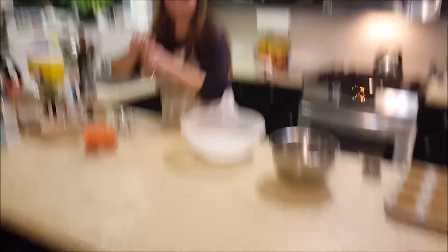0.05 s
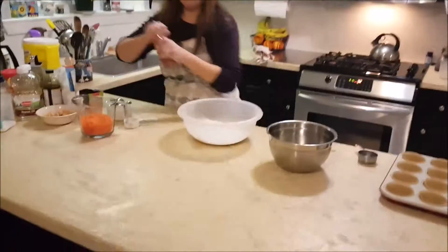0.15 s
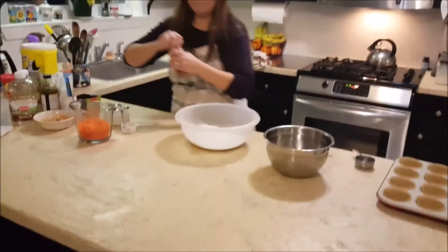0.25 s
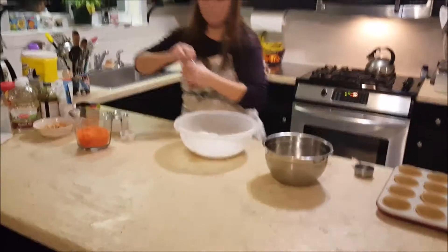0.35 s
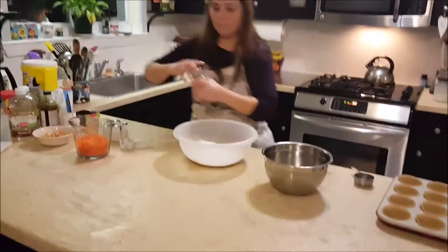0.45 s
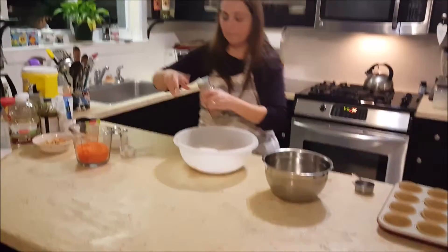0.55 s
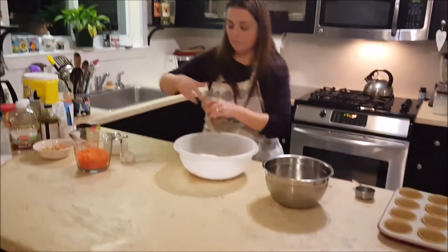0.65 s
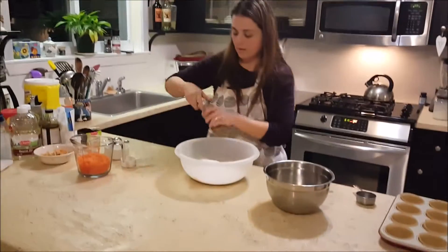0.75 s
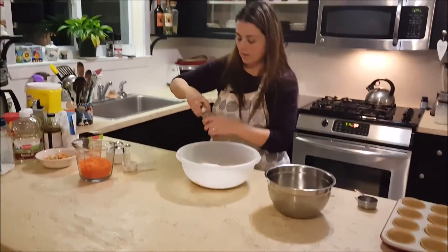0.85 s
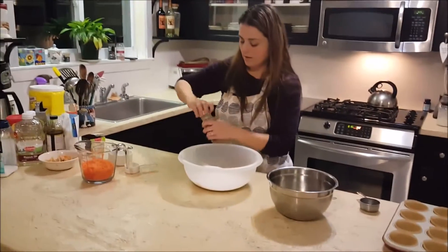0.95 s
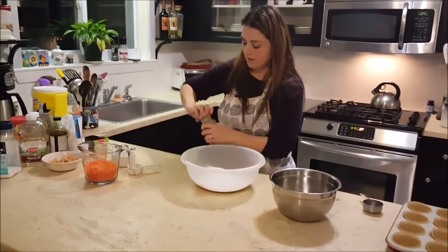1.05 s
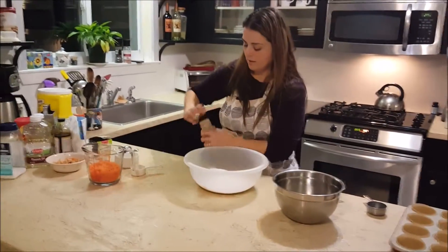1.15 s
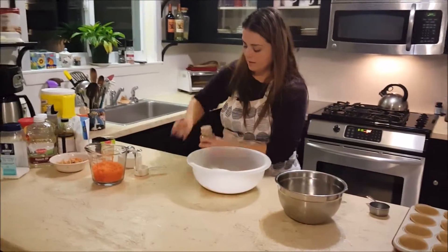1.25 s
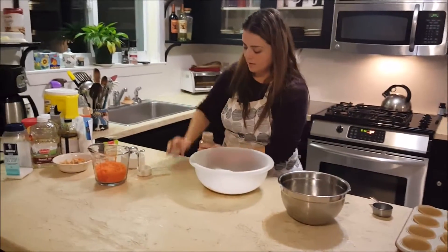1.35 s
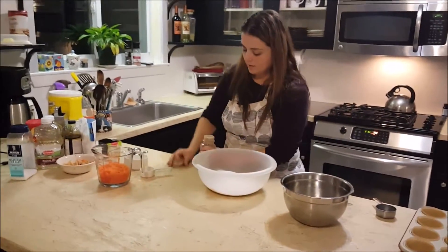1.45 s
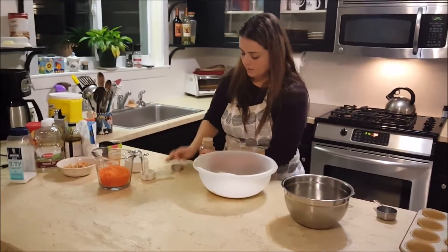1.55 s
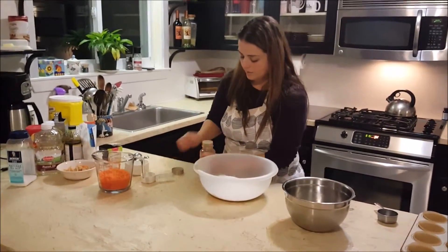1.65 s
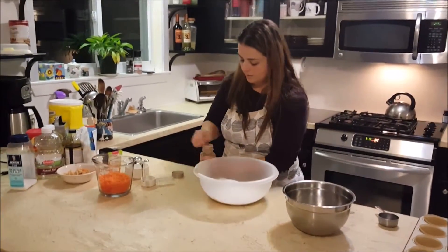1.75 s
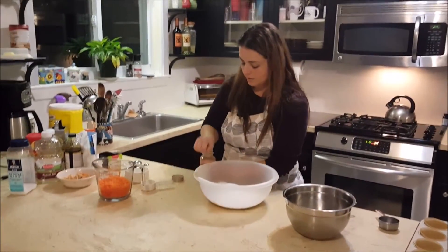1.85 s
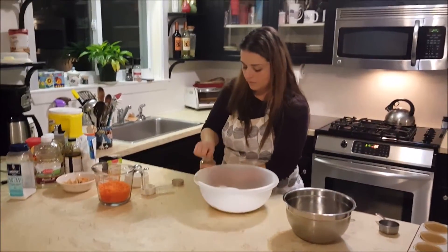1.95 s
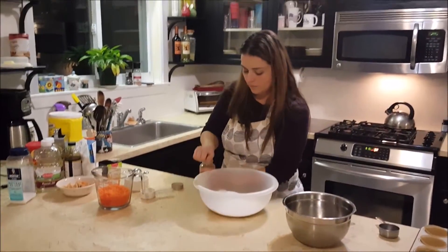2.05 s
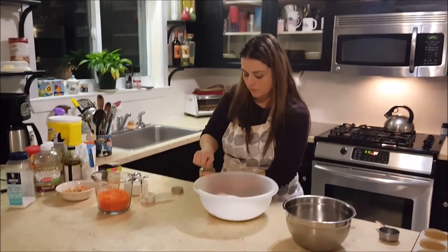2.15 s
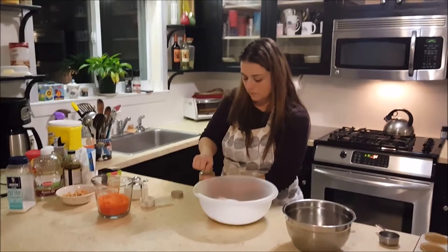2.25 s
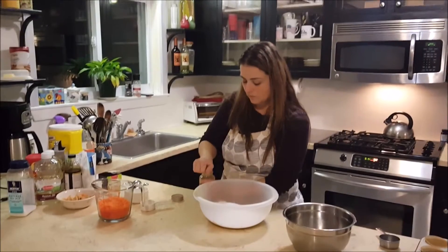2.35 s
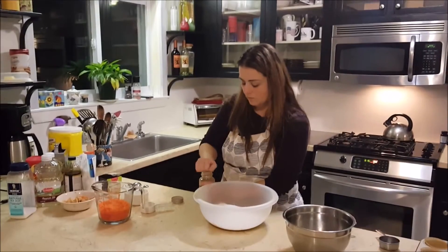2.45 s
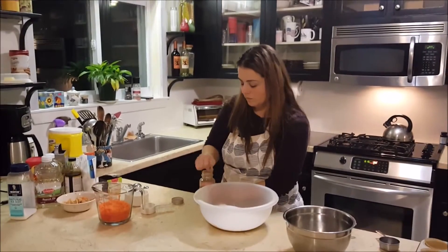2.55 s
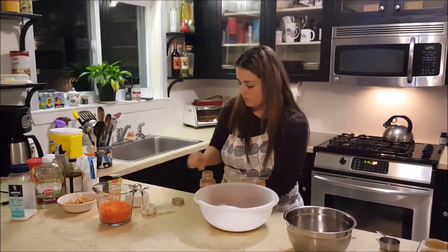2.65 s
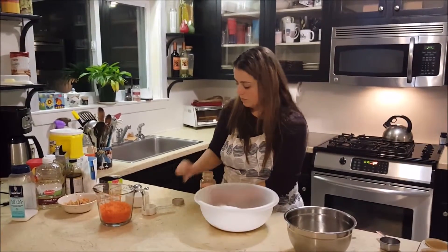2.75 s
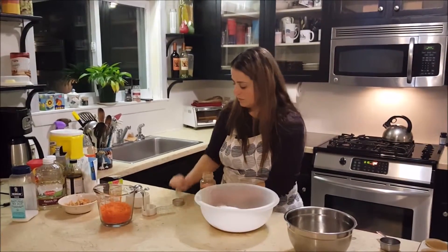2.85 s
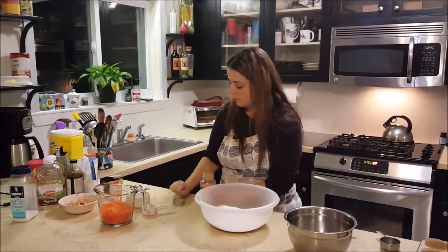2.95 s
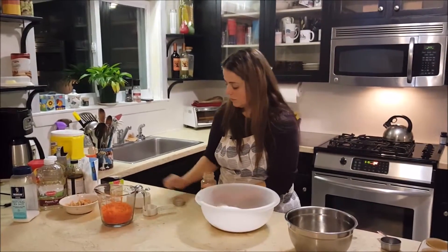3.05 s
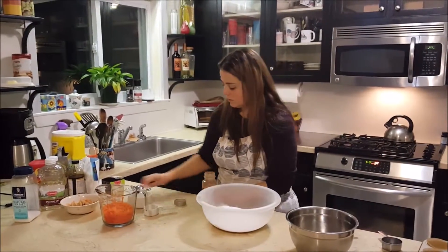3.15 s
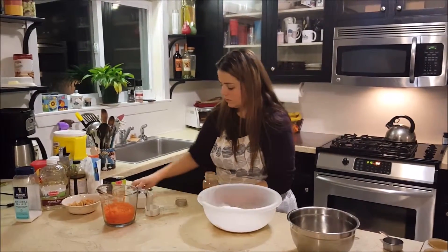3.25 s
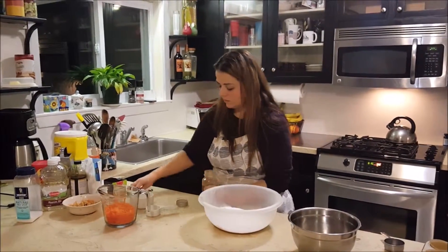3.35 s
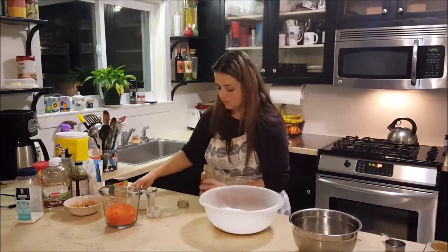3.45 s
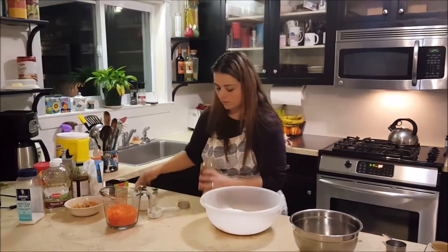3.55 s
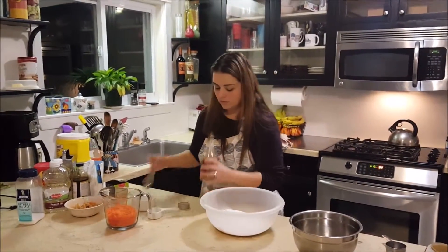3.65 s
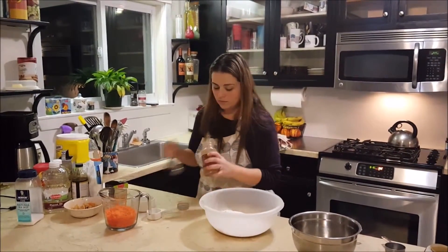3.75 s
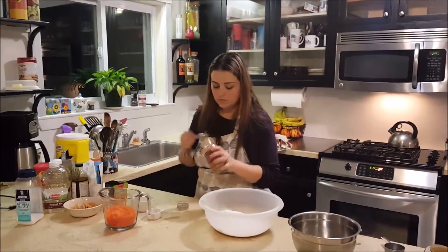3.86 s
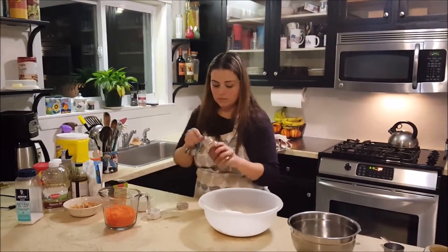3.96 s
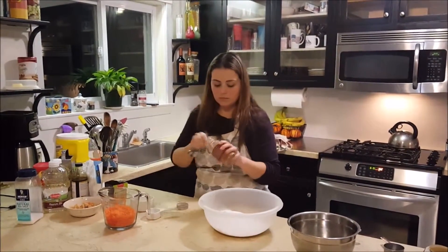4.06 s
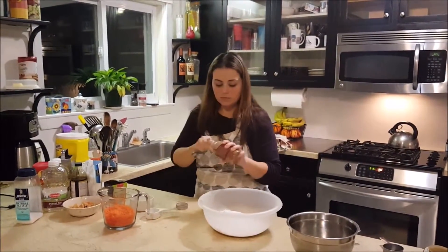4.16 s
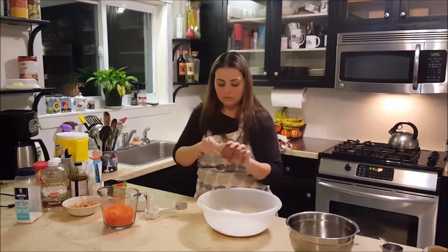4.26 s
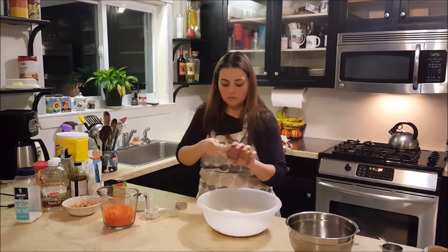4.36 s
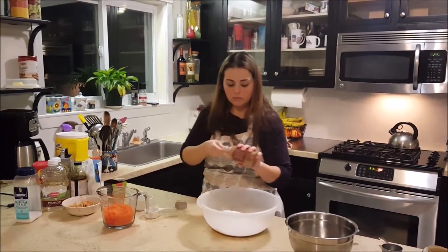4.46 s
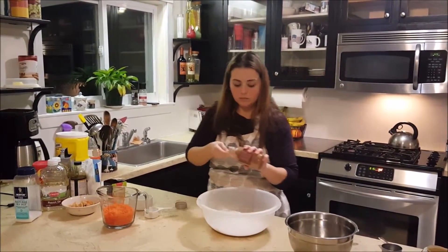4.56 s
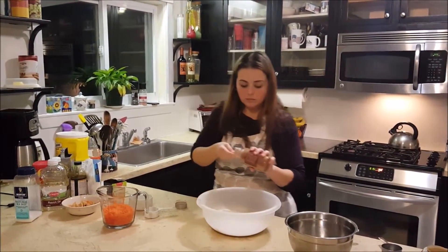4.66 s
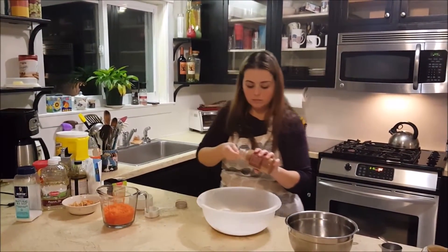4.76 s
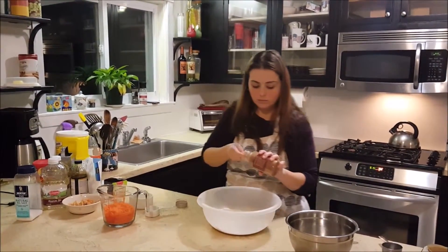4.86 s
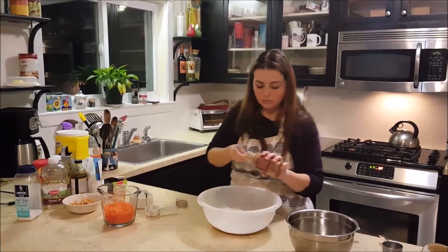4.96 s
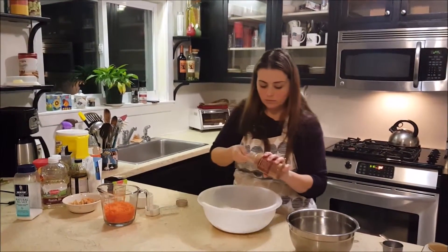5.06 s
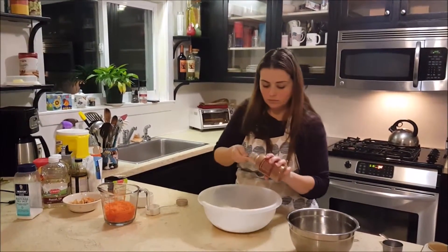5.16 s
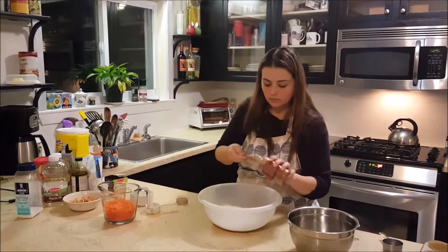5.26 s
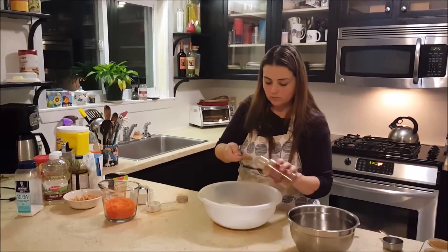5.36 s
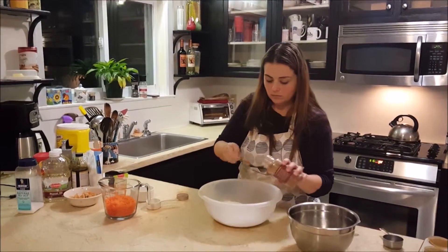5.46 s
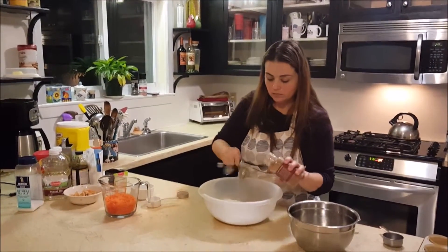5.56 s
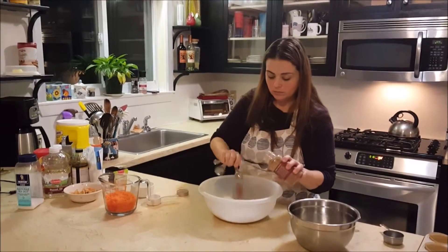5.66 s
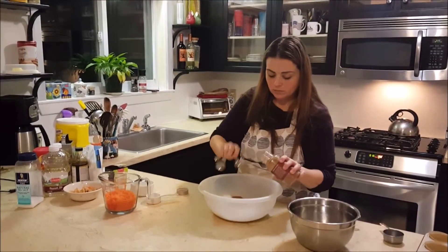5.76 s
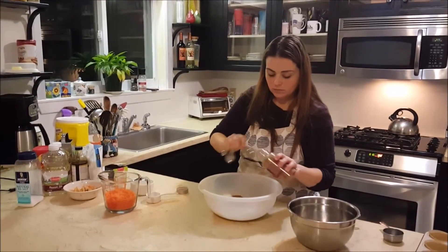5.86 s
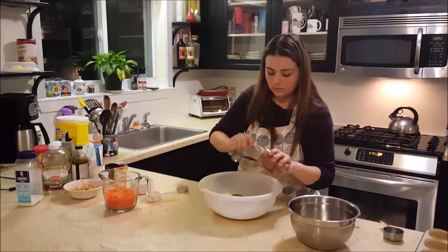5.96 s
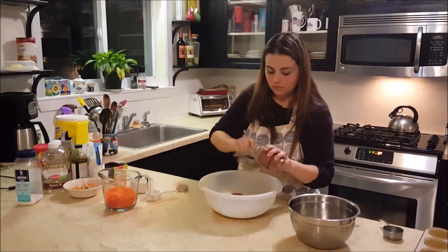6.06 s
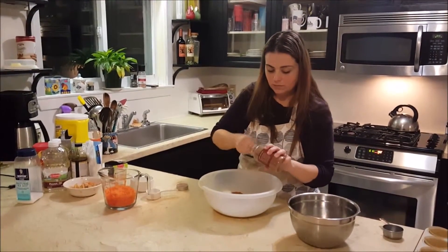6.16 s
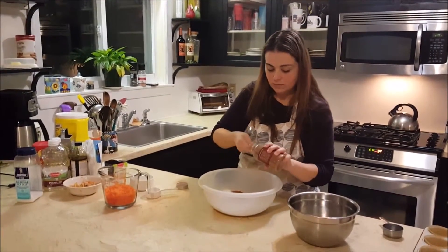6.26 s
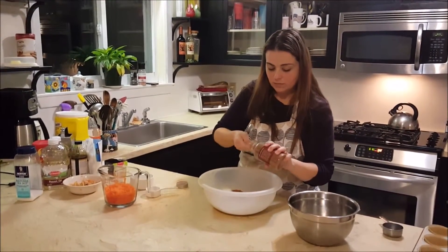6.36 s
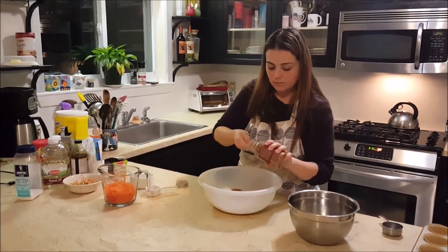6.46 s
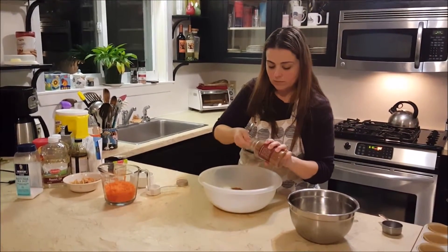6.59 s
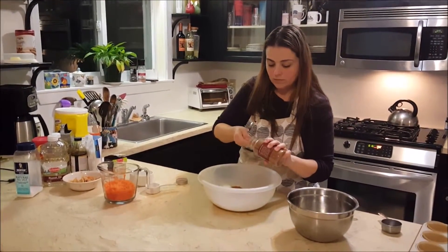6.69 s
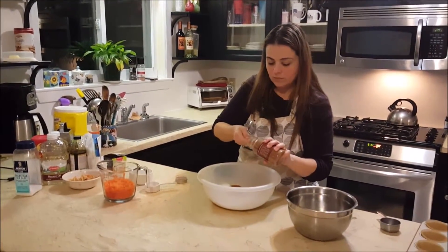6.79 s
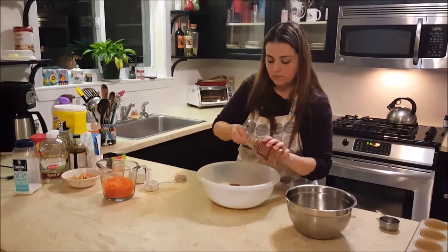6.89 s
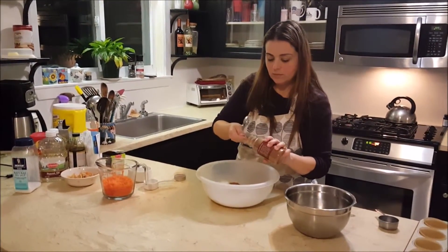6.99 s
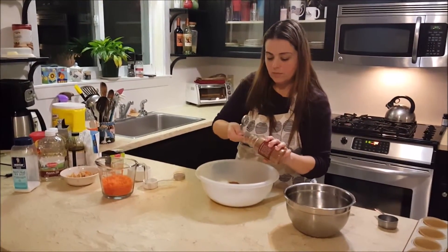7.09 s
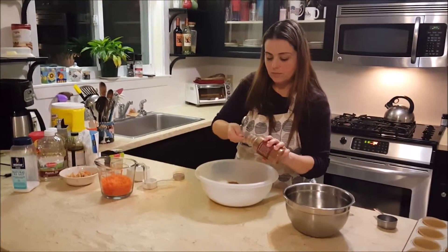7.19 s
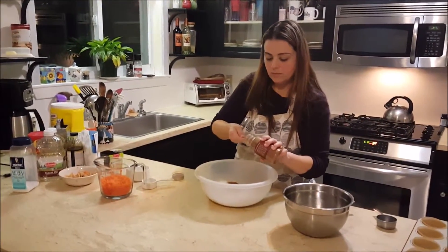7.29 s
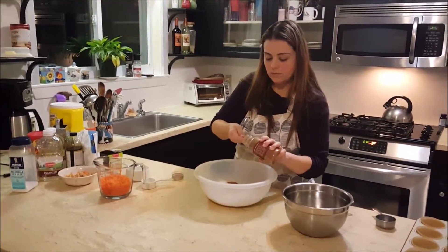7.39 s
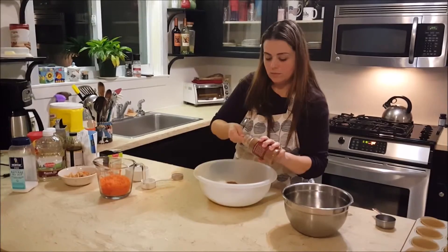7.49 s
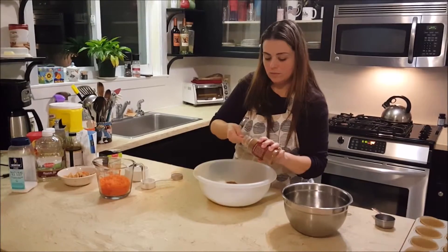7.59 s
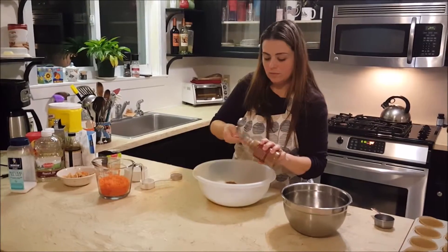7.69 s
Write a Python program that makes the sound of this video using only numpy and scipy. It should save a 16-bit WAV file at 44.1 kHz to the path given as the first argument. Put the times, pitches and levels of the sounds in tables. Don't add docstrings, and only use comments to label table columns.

```python
import sys
import numpy as np
from scipy import signal
from scipy.fft import rfft, irfft
from scipy.io import wavfile
from scipy.ndimage import uniform_filter1d

SR = 44100
rng = np.random.default_rng(int(sys.argv[2]) if len(sys.argv) > 2 else 0)


def to_wav(sig):
    pcm = np.clip(np.atleast_2d(sig), -1, 1) * 32767
    pcm = np.round(pcm).astype(np.int16)
    wavfile.write(sys.argv[1], SR, pcm.T)


def boost(x):
    u = np.asarray(x, float) / 20
    return 10 ** u


N = 340848

# start in seconds, blow level in dB, ring
# pitch in Hz, # tick level in dB relative to the blow, room level in dB.
KNOCKS = [
    (0.5804, -49.5, 1850, -15, 0),
    (0.811, -48, 1530, -28, 3),
    (0.9876, -57, 2460, -1.5, 14),
    (1.2015, -56.5, 1300, -0.5, 6),
    (1.2398, -47, 3080, -15, 5.5),
    (2.169, -51.5, 2800, 7.5, -3),
    (5.0105, -59.5, 1100, 10.5, 3.5),
    (6.0894, -57, 1510, 7, -6),
]
CLACKS = [
    (3.0664, -50, 1723, -14, 6.5),
    (3.3256, -58, 2703, -24, 1),
    (3.4595, -54.5, 1250, -20, 0.5),
    (3.5193, -41.5, 1960, -10.5, 8.5),
    (3.5384, -39, 2350, -11, 7.5),
    (3.628, -35, 2170, -12, 6.5),
    (3.6421, -38.5, 2170, -17, 3.5),
    (3.716, -41, 2050, -7, -1),
    (6.575, -53.5, 1695, 4, -8.5),
]
CLINKS = [(2.2157, -56.5, 5020, -10, -6.5), (2.636, -73, 5040, 10, 0), (4.1305, -46.5, 4610, -20.5, 3),
          (5.5318, -61, 3490, 8, -27.5), (5.758, -50.5, 3840, 5.5, 4.5), (5.8541, -49, 3420, 7, 2),
          (5.984, -63.5, 4370, 2, 9.5), (6.0064, -63, 2890, 8, -3), (6.056, -40.5, 5080, -74, 0.5),
          (6.1749, -49.5, 5030, -2, -2), (6.2072, -49, 4940, 6.5, -6.5)]
# start in seconds, blow level in dB, boom pitch in Hz,
# length of the boom in cycles, knock level in dB relative to the blow.
THUMPS = [
    (.216, -49, 253, 4.4, -25),
    (.232, -47.5, 143.9, 3, -7),
    (.25, -48, 127, 3.1, -19),
    (1.5295, -39, 231, 2.8, -4),
    (1.74, -53, 112.9, 6.8, -29),
    (2.484, -51.5, 152, 7.1, -12),
    (3.366, -53.5, 280, 5.9, -20),
    (4.49, -51.5, 82.6, 4, -32),
]
# start in seconds, level in dB.
BOWL_TAP = [
    (5.757, -29),
]
# pitch in Hz, level in dB, time to fall by 60 dB in seconds.
BOWL_TONES = [(330, -14.5, 0.126), (450, 2.5, 0.022), (550, 0, 0.041), (655, -3, 0.066), (880, 8, 0.015),
              (1420, 6.5, 0.012), (2050, -0.5, 0.025), (2565, -1.5, 0.012)]
# pitch in Hz, level in dB relative to the blow, time to fall by 60 dB in seconds.
GLASS_TONES = [(6710, -27, 0.078)]
# first a colour, each row pitch in Hz and level in dB per Hz; then the blows, each row
# start in seconds, level in dB, room level in dB, and for cap and jar inside also brightness in dB per octave.
CAP = ([(200, -30.5), (450, -17), (860, -4.5), (1100, -9.5), (1500, -4), (2100, -4.5), (2800, -4),
       (4200, -10.5), (6500, -24), (15000, -52.5)], [(1.5865, -12.5, -.7, -1.5), (1.6296, -13, .5, 3),
       (1.676, -23, 1.4, -2)])
JAR_BASE = [(290, -22.5), (600, -5), (900, -3), (1410, -7.5), (1650, -5), (1880, -8.5), (2330, -7.5),
            (3000, -13.5), (15000, -38.5)], [(2.4845, -42, 8.43)]
SPOON_LIFT = [(180, -25), (300, -13), (1260, -6.5), (1350, -3), (1490, -8.5), (2440, -2), (4960, -12),
              (6680, -26.5), (8420, -12), (15500, -17.5)], [(3.145, -27.5, 1.2)]
JAR_NECK = ([(600, -18), (1300, -14.5), (2700, -8.5), (3700, -4), (4800, -2.5), (5600, -4), (7000, -6),
            (14000, -6.5), (16000, -11)], [(3.9664, -32, 6.5), (4.0028, -25, 8.8)])
JAR_WALL = ([(200, -15), (700, -5.5), (1200, -3.5), (1800, -9.5), (2700, -10), (3500, -19), (8000, -27.5),
            (14000, -28.5)], [(4.108, -37.5, 4.3), (4.183, -44.5, 1.8)])
JAR_RIM = ([(150, -15), (680, 0.5), (1150, -10), (1400, -9), (1750, -20.5), (2500, -5.5), (3150, -7.5),
           (3900, -21), (4600, -16), (6000, -35.5), (12000, -39)], [(6.13, -36.5, 3.63)])
JAR_INSIDE = ([(200, -30), (430, -5.5), (540, -11.5), (670, 0), (1150, -16), (1850, -7), (2400, -12),
              (2800, -21), (3250, -19), (3700, -23), (4470, -15.5), (5500, -30), (7800, -24), (12000, -43)],
              [(5.0095, -38, -1.5, 1), (6.689, -54, 1, 0), (6.924, -43.5, 0.5, -2), (7.464, -46.5, 1, 0),
              (7.58, -40.5, 0.5, 0)])
# pitch in Hz, level in dB relative to the blow,
# time to fall by 60 dB in seconds.
CAP_TONES = [(888, -26.5, 0.092), (1290, -18, 0.06), (1540, -24.5, 0.1), (1850, -28, 0.075),
             (2170, -24.5, 0.08), (2450, -23.5, 0.064), (2740, -28, .11), (3070, -19.5, 0.06)]
JAR_TONES = [(441, -9, 0.054), (1930, -7, 0.02), (4380, -17.5, 0.02)]
# start in seconds, level in dB, pitch in Hz, rise in seconds,
# time to fall by 60 dB in seconds.
WOKEN_TONES = [(.21, -52.5, 75, .03, .25), (.37, -63, 84, .02, 0.18), (1.79, -61, 285, 0.018, 0.25),
               (1.5304, -32, 238, 0.00321, 0.028), (1.54, -44.5, 150, 0.009, 0.17),
               (1.537, -49.5, 491, 0.0048, .05), (1.547, -42, 270, 0.0043, 0.042),
               (2.478, -54, 880, 0.0024, 0.036), (2.484, -46.5, 896, 0.00155, 0.021),
               (2.483, -53.5, 1200, 0.0014, 0.0275), (2.485, -43.5, 290, 0.011, 0.103),
               (2.511, -45.5, 330, 0.00343, 0.073), (2.535, -50.5, 300, .005, 0.075),
               (3.066, -51.5, 1694, .001, .03), (3.5372, -37.5, 2656, 0.0024, 0.035),
               (3.54, -42, 1814, 0.0051, 0.046), (3.558, -48.5, 1915, .004, .05),
               (3.574, -49, 1070, 0.007, 0.049), (3.59, -52, 1800, .006, 0.046),
               (3.6287, -43, 2430, 0.00204, .04), (3.642, -45, 2190, 0.0021, 0.077),
               (3.7157, -49, 2255, 0.00194, .03), (3.9658, -47, 3980, .002, .025),
               (4.109, -47.5, 1154, 0.0026, 0.031), (5.0111, -49.5, 1235, 0.0018, 0.039),
               (5.759, -38, 655, 0.0094, 0.084), (5.784, -38.5, 593, 0.00654, 0.043),
               (5.759, -45, 1406, 0.0037, 0.033), (5.774, -51, 1420, .004, .04),
               (6.925, -67, 7920, .001, 0.02), (7.581, -57, 3183, .002, 0.061),
               (7.592, -56.5, 670, .006, 0.084), (7.607, -58.5, 2314, .005, 0.055)]
SQUEAKS = [(3.726, -45, 6180, .005, 0.034), (3.737, -49, 3640, .004, 0.033), (3.75, -49, 3590, .005, .025),
           (3.761, -56, 3230, 0.0045, .03), (3.756, -49, 8900, .004, .025), (3.766, -42, 8600, .003, .025),
           (3.76, -47, 12500, .006, .03), (3.771, -42.5, 10600, .009, .05), (3.804, -42, 9230, .003, 0.035),
           (3.809, -51, 10900, 0.0055, .03), (3.81, -48, 7800, .006, .05)]
FURTHER_TONES = [(0.8103, -51.5, 1393, .002, 0.034), (.8115, -53, 2900, .002, 0.025),
                 (.934, -58, 2420, .001, .02), (.957, -61, 1923, .001, .02),
                 (.993, -53.5, 904, .001, 0.028), (1.069, -54, 1200, .001, 0.01),
                 (1.241, -58.5, 3070, .002, .05), (1.5923, -39, 1290, .004, .06),
                 (1.597, -29, 2510, 0.00215, .03), (1.607, -35, 1200, 0.0033, .04),
                 (1.632, -25.5, 1607, .002, .02), (1.6309, -23.5, 2920, 0.00095, 0.016),
                 (1.6312, -26, 3600, 0.00073, 0.0143), (1.698, -42.5, 953, 0.0037, 0.041),
                 (3.0665, -55.5, 3200, .0008, 0.024), (3.0664, -64, 871, .002, .03),
                 (3.1462, -42.5, 3500, 0.00063, 0.011), (3.966, -54, 7500, 0.0022, .03),
                 (4.006, -49.5, 3574, .004, .08), (3.4923, -55, 1750, .001, .02),
                 (3.5263, -44, 1915, 0.0009, .015), (3.628, -45, 2930, .0006, .012),
                 (3.8061, -47.5, 2880, 0.00064, 0.011), (3.15, -50, 2220, .003, 0.036),
                 (3.146, -56, 8294, 0.0022, 0.03), (3.1459, -43, 2920, .0005, .01),
                 (4.004, -39.5, 5520, 0.003, 0.055), (4.13, -55, 4620, .002, .03),
                 (4.184, -51, 2500, 0.00102, .03), (5.0106, -49.5, 963, 0.00195, 0.0256),
                 (5.035, -57.5, 483, .005, 0.047), (5.8546, -55, 3520, 0.00212, .04),
                 (5.875, -63, 8000, .008, .06), (5.856, -60, 6650, .005, .2),
                 (6.131, -47, 2556, 0.00107, 0.026), (6.131, -49, 3190, .001, .03),
                 (6.131, -56, 1330, .002, .04), (6.131, -54, 4500, .001, .04),
                 (6.175, -58, 8160, .002, .03)]
# start, rise and fall in seconds, scrape level in dB,
# fizz level in dB relative to the scrape.
RUBS = [(2.165, 0.0086, 0.12, -77, 6.5), (2.38, 0.044, 0.095, -91, 13), (3.455, 0.022, 0.084, -60.5, -12),
        (3.525, 0.036, 0.08, -47.5, -2.5), (3.63, 0.018, 0.093, -51, -1), (3.705, 0.014, 0.04, -55, 10),
        (3.73, 0.0477, 0.021, -60, 18.5), (3.8, 0.0098, 0.036, -56, 15), (3.81, .03, .11, -65.5, 12),
        (4.36, 0.07, 0.093, -75, 0), (5.96, 0.038, 0.045, -83, 12.5), (6.135, 0.029, 0.11, -63.5, -10),
        (6.485, 0.032, 0.13, -68.5, -7), (7.07, 0.026, 0.13, -73.5, -14.5)]
# pitch in Hz, level in dB per Hz.
SCRAPE_COLOUR = [(450, -30.5), (800, -10.5), (1100, -8.5), (1500, -10), (1950, -4), (2250, -5.5),
                 (2650, -10.5), (3100, -13), (4300, -23), (5800, -38)]
FIZZ_COLOUR = [(2000, -23), (3200, -4), (5500, -8.5), (8500, -5), (12000, -6), (15800, -11)]
STIR_COLOUR = [(90, -7), (160, -6), (300, -3), (500, 4.5), (800, -20)]
# start, rise and fall in
# seconds, rub level in dB, hiss level in dB relative to the rub.
THUMB = [
    (.09, 0.035, 0.024, -58, -16),
    (.116, 0.04, 0.031, -44, -14.5),
    (.16, 0.02, 0.012, -39, -18),
    (.185, 0.04, 0.015, -54.5, -1.5),
    (1.449, 0.0059, 0.035, -57.5, -3.5),
    (1.47, 0.021, 0.022, -58.5, -0.5),
]
SLEEVE = [(.235, 0.058, 0.1183, -69.5, 2), (.44, 0.0126, 0.043, -71, 7), (.48, 0.045, 0.044, -69, 8),
          (.57, 0.046, 0.13, -70, -0.5), (.64, 0.1, 0.097, -74, 6), (.805, 0.01286, 0.096, -65.5, -6),
          (.92, 0.048, 0.036, -67, -0.5), (.96, 0.0455, 0.18, -69, -2.5), (1.17, 0.081, 0.066, -70, 1.5),
          (1.28, 0.031, 0.16, -77, 0), (6.49, 0.027, 0.13, -82.5, 14.5), (4.37, 0.04, 0.11, -89.5, 14)]
PALM = [
    (-.012, 0.025, 0.057, -70, 15.5),
    (.038, 0.04, 0.04, -72.5, 14.5),
]
# pitch in Hz, level in dB per Hz.
GRIP_COLOUR = [(300, -13), (650, -4), (1300, 6), (1900, 4.5), (2700, 1.5), (3300, -11), (5000, -63)]
# start in seconds, level in dB, pitch in Hz, length in seconds,
# left-right difference in dB.
SHELL_TICKS = [
    (0.059, -50.5, 820, 0.0028, 34.5),
    (0.256, -54, 1490, 0.0044, 22),
    (0.276, -49, 1170, 0.00332, 22),
    (0.363, -50.5, 980, 0.0032, 17),
    (0.378, -49.5, 850, 0.0047, 19),
    (0.436, -24.5, 1610, 0.0027, 10.5),
    (1.45, -50, 1370, 0.016, 16),
]
# time in seconds, rumble level in dB.
SHAKE = [
    (0, -63.5),
    (.2, -71.5),
    (.3, -63.5),
    (.43, -79),
    (.6, -64),
    (.85, -72.5),
    (.93, -66),
    (1.1, -85.5),
    (1.5, -79),
]
# pitch in Hz, time to fall by 60 dB in seconds.
ROOM_FADE = [(100, 0.41), (300, 0.64), (800, 0.39), (1500, 0.448), (3000, 0.37), (6000, 0.4), (12000, 0.25)]
# pitch in Hz, likeness from 0 to 1.
ROOM_LIKENESS = [(60, 0.895), (150, 0.9), (380, 0.78), (950, 0.15), (2400, 0.041)]
# pitch in Hz, left minus right in dB.
PORT_LEAN = [(60, 0), (130, 1), (290, -0.5), (640, 1), (1410, 3.5), (3100, -4), (6820, -2), (15000, -5)]
# pitch in Hz, level in dB.
PORT_COLOUR = [(40, -16.5), (120, 3.5), (6500, -2), (8200, 2), (10000, -3), (12500, 1)]
# pitch in Hz, level in dB per Hz.
AIR_COLOUR = [(15, -30), (21, -9), (32, -22.5), (53, -5), (81, -15.5), (107, -4.5), (221, -5), (301, -8),
              (409, -7.5), (639, -14.5), (756, -12.5), (2450, -17), (5350, -31.5), (8130, -33),
              (15900, -34.5)]
# pitch in Hz, likeness up to 1, where 0 or less is
AIR_LIKENESS = [(60, -0.39), (150, 0.59), (380, 0.79), (950, -0.21), (2380, -0.39), (5980, 0.27),
                (15000, -0.98)]
# pitch in Hz, width in Hz, level in dB.
HUM = [
    (56.9, 15.54, -85),
    (121.1, 5.2, -80.5),
    (228, 22, -78.5),
    (415.5, 4.2, -81.5),
]


def evened(x):
    return x / np.sqrt(np.mean(x ** 2) + 1e-20)


def read(points, hz):
    f, value = np.transpose(points)
    return np.interp(np.log(hz + 1), np.log(f + 1), value)


def add(mix, s, sound):
    at = round(s * SR)
    sound = sound[:, max(-at, 0):]
    part = mix[:, max(at, 0):][:, :sound.shape[1]]
    part += sound[:, :part.shape[1]]


def colour(x, points):
    size = x.shape[-1]
    return irfft(rfft(x) * boost(read(points, np.fft.rfftfreq(size, 1 / SR))), size)


def alike(z, hz, points):
    same = np.clip(read(points, hz), 0, 1)[:, None]
    return np.array([z[0], same * z[0] + np.sqrt(1 - same ** 2) * z[1]])


def pan(pan_db):
    return boost([[pan_db / 2], [-pan_db / 2]])


def chatter():
    at, sign = rng.random((5, 2)).T
    hits = np.zeros(400)
    share = (np.arange(5) + .3 + .7 * at) / 5
    places = np.clip(share * .0045 * SR, 1, 399).astype(int)
    hits[places] = 0.69 * np.sign(sign - .5) * (1 - 0.82 * share)
    return hits


def room(x, wet_db, image=0., rattle=0., size=24000):
    taps = np.clip(rng.standard_normal((2, size)), -1.6, 1.6) * (rng.random((2, size)) < .07)
    hz, t, z = signal.stft(taps, SR, nperseg=256)
    fade = boost(-60 * t / read(ROOM_FADE, hz)[:, None])
    tail = signal.istft(alike(z, hz, ROOM_LIKENESS) * fade, SR, nperseg=256)[1]
    t = np.arange(tail.shape[1]) / SR
    tail = tail * np.clip(t / .0015 - .5, 0, 1)
    tail = tail * (1 + 0.55 * np.exp(-t / 0.017))
    tail *= boost(wet_db) / np.linalg.norm(tail[0])
    tail[0, 0] = tail[1, 2] = 1
    tail[0, 10] = tail[1, 9] = -image
    tail[:, :400] += rattle * chatter()
    return signal.fftconvolve(x * np.ones((2, 1)), tail, axes=1)


def blip(hz, turns, size=2048):
    u = np.arange(size + 1) / SR * hz / turns
    motion = u ** 2 * np.exp(-5.5 * u) * np.sin(2 * np.pi * turns * u)
    x = np.diff(motion)
    return x / abs(x).max()


def tick(size=2048):
    parts = (6000, 0.27), (8300, 0.68), (11500, 0.62), (14000, 0.5)  # Hz, gain
    return sum(g * blip(hz, 3.82, size) for hz, g in parts)


def modes(table, size):
    t = np.arange(size) / SR
    return sum(boost(db - 60 * t / t60) * np.sin(2 * np.pi * hz * t) for hz, db, t60 in table)


def struck(points, db, wet_db, bright_db=0, image=0, rattle=0.55):
    hz = abs(np.fft.fftfreq(4096, 1 / SR))
    colour_db = read(points, hz) + bright_db * np.log2(np.clip(hz / 2000, .25, 8))
    spectrum = np.exp(np.conj(signal.hilbert(np.log(boost(colour_db)))))
    blow = np.fft.ifft(spectrum).real[:2048]
    blow = np.pad(blow, (55, 0)) / abs(blow).max()
    return room(boost(db - 1.0) * blow, wet_db + 4.5, image, rattle)


def knock(db, hz, tick_db, wet_db, thud_db=-4, rattle=0.16):
    blow = blip(hz, turns=1.59) + 0.34 * blip(1.9 * hz, turns=2.1) + 0.33 * blip(0.52 * hz, turns=2.2)
    thud = blip(422, turns=1.3) + 1.613 * blip(666.9, turns=2.25) + 0.6 * blip(950, turns=3.0)
    hit = blow + boost(thud_db - 4.5) * thud + boost(tick_db) * tick()
    return room(boost(db + 3.0) * hit, wet_db, rattle=rattle)


def clack(*row):
    return knock(*row, thud_db=-15, rattle=0.63)


def clink(db, hz, tick_db, wet_db):
    size = 6000
    blow = blip(hz, 1.9, size) + 0.57 * blip(1.679 * hz, 3.3, size) + modes(GLASS_TONES, size)
    thud = boost(-28.5) * blip(1030, 1.3, size)
    return room(boost(db + 5.5) * (blow + thud + boost(tick_db) * tick(size)), wet_db + 3.0, rattle=0.62)


def thump(db, hz, turns, knock_db):
    size = 8192
    parts = (.55, 0.18, 0.66), (1, 0.91, 0.67), (1.45, 0.45, 1.2)
    boom = sum(g * blip(k * hz, n * turns, size) for k, g, n in parts)
    top = blip(880, 2.5, size) + 1.8 * blip(2400, 1.9, size)
    top = top + .15 * blip(4600, 1.3, size) + .05 * tick(size)
    blow = boom + boost(knock_db) * np.roll(top, round(0.11 * turns / hz * SR))
    return room(boost(db - 6.0) * blow, 6.5 + 0.53 * knock_db)


def bowl(db):
    ring = modes(BOWL_TONES, size=8000) * np.clip(np.arange(8000) / SR / 0.00088, 0, 1)
    ring = ring + 0.12 * np.roll(ring, round(0.036 * SR))
    return room(boost(db - 2.5) * ring / abs(ring).max(), wet_db=0.5)


def rings():
    low_hz, low_in_room = 700, 0.68
    strike_delay_s = .0013
    dry, t = np.zeros((2, N)), np.arange(9000) / SR
    for s, db, hz, rise, t60 in WOKEN_TONES + SQUEAKS + FURTHER_TONES:
        swell = np.sin(np.pi / 2 * np.minimum(t / rise, 1)) ** 2
        fade = boost(db - 60 * np.maximum(t - rise, 0) / t60)
        add(dry, s, swell * fade * np.sin(2 * np.pi * hz * t) * np.array([[hz >= low_hz], [hz < low_hz]]))
    for table, blows in ((CAP_TONES, CAP[1]), (JAR_TONES, JAR_INSIDE[1])):
        for s, db, *_ in blows:
            add(dry[:1], s + strike_delay_s, boost(db) * modes(table, size=9000)[None])
    high, low = dry
    return room(high + low_in_room * low, wet_db=-5)[:, :N] + (1 - low_in_room) * low


def slips(size, per_s, spread_db, channels=1):
    hit = rng.random((channels, size)) < per_s / SR
    strength_db = spread_db * np.minimum(rng.exponential(1, size), 3)
    return hit * rng.uniform(-1.58, 1, (channels, size)) * boost(strength_db)


def patchy(x, patch_db):
    z = signal.stft(x, nperseg=256, noverlap=192)[2]
    patches = uniform_filter1d(rng.standard_normal(z.shape[1:]), size=2, axis=0)
    patches = uniform_filter1d(patches, size=9, axis=1)
    z = z * boost(patch_db * evened(patches))
    return evened(signal.istft(z, nperseg=256, noverlap=192)[1][:, :x.shape[1]])


def stroke(rise, fall):
    away = np.r_[np.linspace(1, 0, round(rise * SR)), np.linspace(0, 1, round(fall * SR))]
    return -11.5 * away ** 1.772


def rub(rise, fall, db, fizz_db):
    press_db = stroke(rise, fall)
    size = len(press_db)
    stir_db = -69 + 0.85 * (db + 58.0)
    parts = ((SCRAPE_COLOUR, 2500, db), (FIZZ_COLOUR, 7000, db + fizz_db),
             (STIR_COLOUR, 7000, stir_db))
    x = 0
    for points, per_s, level_db in parts:
        layer = patchy(colour(slips(size, per_s, spread_db=3.2, channels=2), points), 4.5)
        x = x + boost(level_db + press_db) * layer
    return room(boost(-2.5) * x * signal.windows.tukey(size, .1), wet_db=-2.5)


def grip(rise, fall, db, hiss_db, pan_db):
    press_db = stroke(rise, fall)
    drag = slips(len(press_db), 5100, spread_db=-1.0, channels=2)
    body = patchy(colour(drag, GRIP_COLOUR), 0.99)
    hiss_colour = [(2500, -6), (3800, 10.0), (6200, 2.0), (8600, 2.5), (10000, -8), (15000, -7.5)]  # Hz, dB
    hiss = patchy(colour(drag, hiss_colour), 1.65)
    x = boost(db + press_db) * (boost(4.5) * body + boost(hiss_db - 1.5) * hiss)
    x = x * pan(pan_db) / np.sqrt(np.cosh(pan_db * np.log(10) / 20))
    return x * signal.windows.tukey(len(press_db), .2)


def shell_tick(db, hz, length, pan_db):
    t = np.arange(0, length, 1 / SR)
    tones = np.sin(2 * np.pi * hz * t) + 0.53 * np.sin(2 * np.pi * 0.35 * hz * t)
    x = np.pad(tones * np.sin(np.pi * t / length) ** 2, (0, 2048 - len(t)))
    crack = np.roll(0.29 * tick() + 0.65 * blip(2340, turns=1.44), 30)
    return boost(db - 8.5) * pan(pan_db) * (x + crack)


def shake():
    s, db = np.transpose(SHAKE)
    t = np.arange(0, s[-1], 1 / SR)
    drag = slips(len(t), 5100, spread_db=2.0)
    low_colour = [(50, -9.5), (110, -1.5), (200, -0.5), (450, -2.5), (800, -30.0)]  # Hz, dB
    return boost(np.interp(t, s, db)) * patchy(colour(drag, low_colour), 2.2) * np.ones((2, 1))


def resonate(x, hz, width):
    r = np.exp(-np.pi * width / SR)
    return signal.lfilter([1 - r, 0, r - 1], [1, -2 * r * np.cos(2 * np.pi * hz / SR), r * r], x)


def refrigerator():
    noise = rng.standard_normal(N)
    return sum(boost(db) * evened(resonate(noise, hz, width)) for hz, width, db in HUM)


def air():
    frames, hz = N // 512 + 5, np.fft.rfftfreq(2048, 1 / SR)
    a, b, c, d, patches = rng.standard_normal((frames, 1025, 5)).T
    patches = evened(uniform_filter1d(uniform_filter1d(patches, 20, 0), 10, 1))
    z = alike([a + 1j * b, c + 1j * d], hz, AIR_LIKENESS)
    z = z * boost(read(AIR_COLOUR, hz)[:, None] + 0.52 * patches)
    return boost(-70) * evened(signal.istft(z, nperseg=2048, noverlap=1536)[1][:, :N])


def scene():
    far, near = np.zeros((2, N)), air() + refrigerator()
    for table, source in ((KNOCKS, knock), (CLACKS, clack), (CLINKS, clink), (THUMPS, thump),
                          (BOWL_TAP, bowl), (RUBS, rub)):
        for s, *row in table:
            add(far, s, source(*row))
    for points, blows in (JAR_BASE, SPOON_LIFT, JAR_NECK, JAR_WALL, JAR_RIM, JAR_INSIDE):
        for s, *row in blows:
            add(far, s, struck(points, *row, image=0.26))
    cap_colour, cap_blows = CAP
    for s, *row in cap_blows:
        add(far, s, struck(cap_colour, *row, image=1.0, rattle=.22))
    far = far + rings()
    for table, pan_db in ((THUMB, 57), (SLEEVE, -0.5), (PALM, -21)):
        for s, *row in table:
            add(near, s, grip(*row, pan_db))
    for s, *row in SHELL_TICKS:
        add(near, s, shell_tick(*row))
    add(near, 0, shake())
    lean_db = read(PORT_LEAN, np.fft.rfftfreq(N, 1 / SR)) / 2
    leaning = irfft(rfft(far) * boost([lean_db, -lean_db]), N)
    return near + colour(leaning, PORT_COLOUR)


def top_cut(x):
    return signal.sosfilt(signal.butter(12, 16500, fs=SR, output="sos"), x)


def record(dry):
    edge = signal.firwin(255, 15900, window=("kaiser", 8), fs=SR)
    mix = signal.oaconvolve(dry, edge[None], "same")
    return top_cut(mix)


dry = scene()
out = record(dry)
to_wav(out)
```